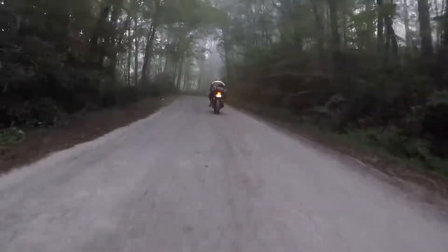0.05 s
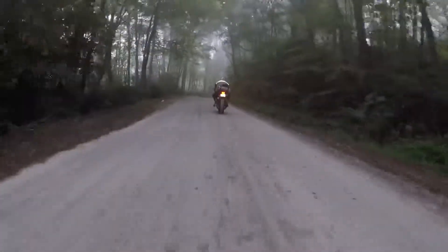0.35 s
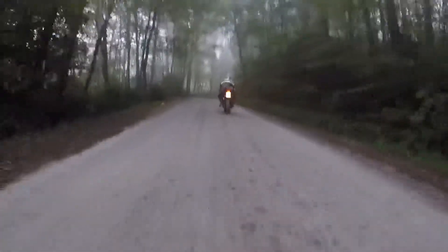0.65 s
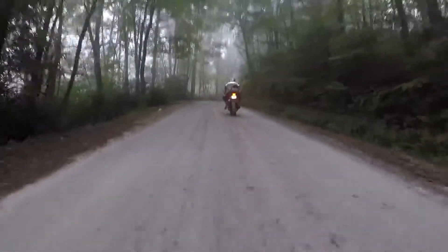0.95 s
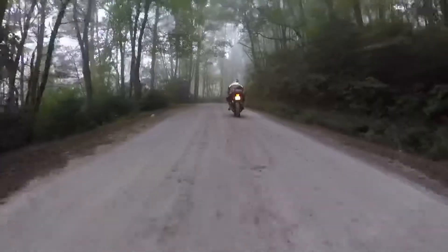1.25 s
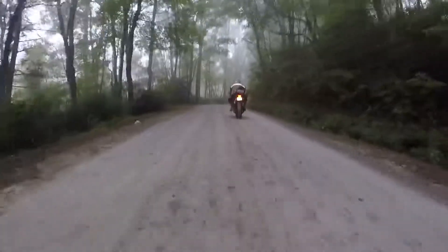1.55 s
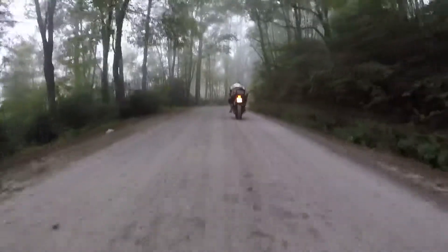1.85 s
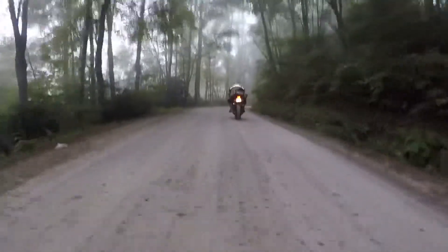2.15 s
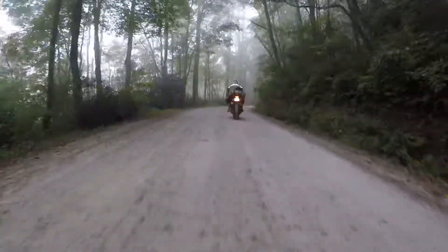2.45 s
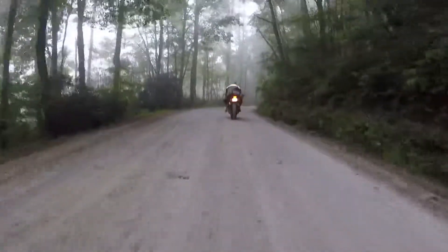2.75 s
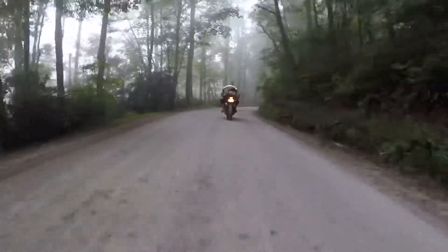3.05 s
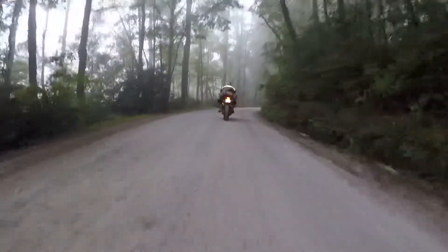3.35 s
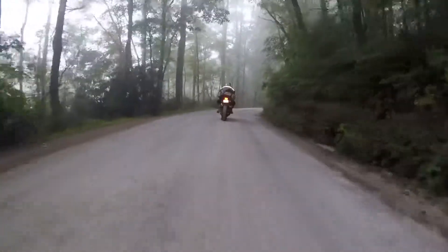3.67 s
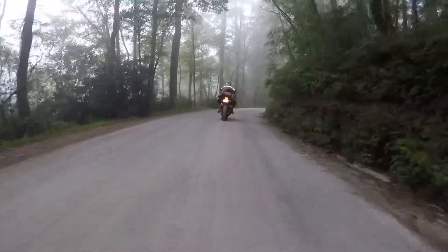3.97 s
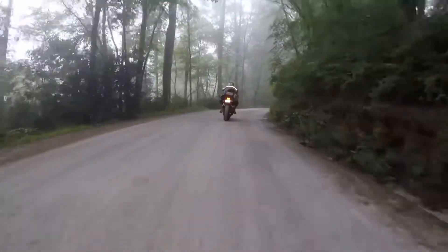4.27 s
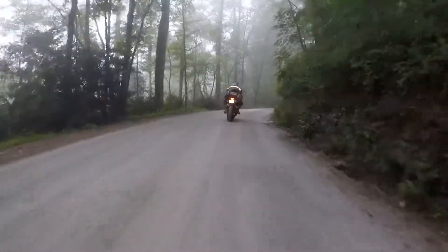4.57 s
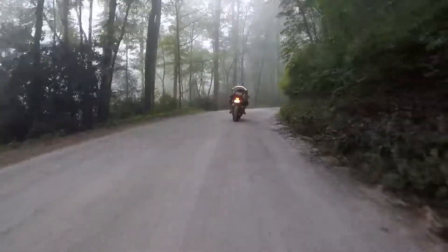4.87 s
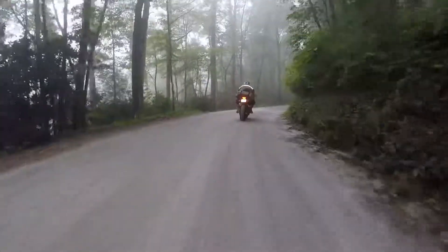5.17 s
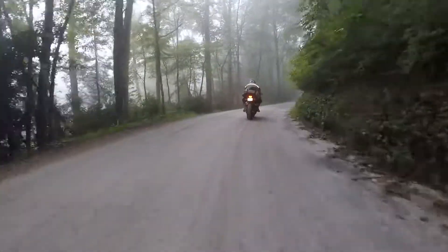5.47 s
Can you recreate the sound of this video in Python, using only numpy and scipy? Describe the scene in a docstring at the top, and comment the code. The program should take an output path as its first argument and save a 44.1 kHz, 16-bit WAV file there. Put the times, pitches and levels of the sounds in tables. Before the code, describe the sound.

A motorcycle rolls slowly along a gravel forest road, heard close up from its tail. The exhaust booms low and even over a rough hum and wind rumble, while the tyres crunch and a few stones tick up. As the revs sag, the boom stumbles, and the suspension gives one dull thump about halfway. Towards the end the boom fades into a higher drone and the engine and bodywork clatter more.

```python
"""A three-cylinder motorcycle rolls slowly along a gravel forest road, heard from its tail.
At first the exhaust booms evenly at the firing rate, blurred by a rough hum near 60 Hz, while wind
rumbles, tyres crunch and a few stones flick up. As the revs sag the boom stumbles and drops out for a
few firings at a time. At 3 s the suspension thumps over a rut. Towards the end the boom fades, its
second harmonic takes over, and the clatter of engine and bodywork comes forward."""
import sys
import numpy as np
from scipy import signal
from scipy.fft import rfft, irfft
from scipy.io import wavfile
from scipy.ndimage import uniform_filter1d, minimum_filter1d

SR = 44100
rng = np.random.default_rng(int(sys.argv[2]) if len(sys.argv) > 2 else 0)


def wav_out(sig):
    """Save sig, one row per channel (or a flat mono array), as 16-bit PCM at SR to the path in sys.argv[1]."""
    wavfile.write(sys.argv[1], SR, np.round(np.clip(np.atleast_2d(sig).T, -1, 1) * 32767).astype(np.int16))


N = 247842


def undb(db):
    """Amplitude ratio of a level in decibels."""
    return 10 ** (np.asarray(db) / 20)


def unit(x):
    """Normalisation to rms 1."""
    return x / np.sqrt(np.mean(x ** 2))


def curve(rows):
    """Linear interpolation of (time [s], value) rows at every sample."""
    times, values = np.transpose(rows)
    return np.interp(np.arange(N) / SR, times, values)


def walk(rate_hz):
    """Slow random modulation: values held for 1 / rate_hz seconds and smoothed twice; rms 1."""
    hold = int(SR / rate_hz)
    steps = np.repeat(rng.standard_normal(N // hold + 1), hold)
    return unit(uniform_filter1d(uniform_filter1d(steps, hold), hold)[:N])


def colour(x, points):
    """Spectral shaping by (frequency [Hz], level [dB]) points, rolling off beyond both ends; rms 1."""
    hz, db = np.transpose(points)
    f = np.maximum(np.arange(N // 2 + 1) * SR / N, 1)
    gain = undb(np.interp(np.log(f), np.log(hz), db))
    skirts = 1 / (1 + (hz[0] / f / 2) ** 2) / (1 + (f / hz[-1] / 2) ** 2)
    return unit(irfft(rfft(x) * gain * skirts, N))


def ring(x, hz, width_hz):
    """Second-order resonance with gain 1 at its centre."""
    return signal.lfilter(*signal.iirpeak(hz, hz / width_hz, fs=SR), x)


def body(x, modes):
    """Modal superposition, each mode two resonators in cascade for steep sides; rms 1."""
    return unit(sum(undb(db) * ring(ring(x, hz, 2 * width), hz, 2 * width) for hz, width, db in modes))


def rumble_and_hum(ride_db):
    """Masking: low wind rumble, plus a rough hum near 60 Hz that blurs the exhaust boom."""
    # wind rumble with the hum's peak at 60 Hz: (frequency [Hz], relative level [dB])
    spectrum = [(5, -13), (14, -3.5), (40, -5.5), (60, -0.5), (100, -9), (160, -14.5), (400, -38)]
    swell_db = 2 * walk(5.8)
    return undb(-2.5 + 0.65 * ride_db + swell_db) * colour(rng.standard_normal(N), spectrum)


def tyres():
    """Shot noise: dense random impacts of gravel, most faint and a few sharp, merge into a crunch."""
    # gravel spectrum: (frequency [Hz], relative level [dB])
    spectrum = [(300, -10), (900, 6), (2000, -5.5), (4000, -20.5), (6000, -18), (7500, -26.5),
                (8900, -26.5), (10000, -34.5), (12000, -42.5), (14200, -74)]
    hits = rng.random(N) < 4000 / SR  # 4000 impacts a second
    grains = hits * rng.standard_normal(N) * undb(1.4 * rng.exponential(size=N))
    return undb(-9.5) * colour(grains * undb(0.33 * walk(16)), spectrum)


def knock(at_s, db, hz, width_hz, decay_s):
    """Damped vibration: exponentially decaying noise, starting near level db, drives one mode."""
    age = np.arange(N) / SR - at_s
    fade = (age >= 0) * np.exp(-np.abs(age) / decay_s)
    ringing = body(fade * rng.standard_normal(N), [(hz, width_hz, 0)])
    return undb(db) * np.sqrt(np.mean(fade ** 2)) * ringing


def stones():
    """Impact excitation: single stones tick against the mudguard and frame."""
    # stone strikes: (time [s], level [dB], frequency [Hz], decay time [s])
    strikes = [(0.315, -16.5, 920, .004), (0.482, -56, 8000, .008), (0.553, -60, 9000, .003),
               (0.972, -34, 2200, .012), (1.415, -51, 6000, .008)]
    return sum(knock(at_s, db, hz, 0.16 * hz, decay_s) for at_s, db, hz, decay_s in strikes)


def thump():
    """Structure-borne sound: a rut sends a dull jolt through the suspension and frame."""
    return knock(at_s=3.02, db=-16, hz=130, width_hz=45, decay_s=0.087)


def clatter(firings, firing_hz):
    """Forced vibration: gas and valve noise pulses with the firings and shakes covers and bodywork."""
    # spectrum of the mechanical rush: (frequency [Hz], relative level [dB])
    rush_spectrum = [(150, -8.5), (270, -3.5), (460, 9.5), (545, -4.5), (900, 1.5), (1200, -1), (1950, -7),
                     (2300, -19), (3300, -15.5), (3900, -26.5), (5050, -31), (5900, -27.5), (7300, -41.5),
                     (13000, -69.5)]
    # modes of covers and bodywork: (frequency [Hz], nominal bandwidth [Hz], relative level [dB])
    panel_modes = [(666, 43, -4), (820, 75, -4), (1268.5, 32.3, 0), (1413, 100, -8), (1593, 37.5, 3.5),
                   (1910, 99, -5.5), (2190, 23, -7.5), (2264, 35, -11), (2583, 40, -10.5), (2938, 102, -13),
                   (3440, 110, -18.5), (4010, 100, -26.5), (4396, 71, -24.5), (4686, 31, -26.5),
                   (5706, 400, -25.5), (7380, 84, -40), (8730, 240, -39)]
    resonant_hz, resonant_width_hz = 70.1, 1.3  # the covers ring most freely at this firing rate
    ringing_db = -3.5 + 2.5 * np.exp(-((firing_hz - resonant_hz) / resonant_width_hz) ** 2)
    beat = 1 + 0.082 * np.cos(2 * np.pi * firings)
    shake = beat * undb(0.15 * walk(60) + 0.27 * walk(8.0))
    rush = colour(shake * rng.standard_normal(N), rush_spectrum)
    panels = body(shake * rng.standard_normal(N), panel_modes)
    return undb(-1.0) * rush + undb(ringing_db) * panels


def burble(firings):
    """Pipe resonance: on a light throttle each charge burns differently; uneven kicks ring the pipes."""
    # exhaust and air box modes: (frequency [Hz], nominal bandwidth [Hz], relative level [dB])
    pipe_modes = [(75.1, 10.3, 1.5), (106, 22, -11), (206.9, 12.2, -3.5), (297, 21.4, -10.5),
                  (384, 22.5, -10), (459.6, 34.6, -15.5)]
    fired = np.diff(np.floor(firings), prepend=0)
    return undb(3.0) * body(fired * rng.standard_normal(N), pipe_modes)


def partial(turns, flutter_db, wobble_rad):
    """Random phase and amplitude modulation of a sinusoid of rms 1."""
    angle = 2 * np.pi * turns + wobble_rad * walk(18)
    return np.sqrt(2) * np.cos(angle) * undb(flutter_db * walk(22))


def lope(firings):
    """Subharmonics: the cylinders are not alike, so the wave repeats only once in three firings."""
    # weaker engine partials: (multiple of the four-stroke cycle rate, relative level [dB])
    orders = [(2, -6.5), (4, 1), (5, -10.5), (10, -11), (12, -16.5), (14, -21), (15, -13), (16, -15),
              (17, -20.5), (18, -12.5), (19, -17.5), (21, -11)]
    cycles = firings / 3
    partials = sum(undb(db) * partial(order * cycles + rng.random(), flutter_db=3.0, wobble_rad=0.28)
                   for order, db in orders)
    # whichever partial slides into the air box resonance growls louder
    return partials + undb(2.5) * ring(partials, hz=381, width_hz=7.8)


def exhaust(firings, firing_hz, ride_db):
    """Harmonic series: the silencer radiates the firing rate and two overtones, unevenly at low revs."""
    # unsteadiness of the boom: (firing rate [Hz], phase wobble [rad], mean depth of dips [dB])
    stumble = [(65, .45, 4), (67, .3, 2.5), (67.2, .14, 1.0), (70, .05, 0.6)]
    # lapses of the boom, each a few firings long: (time [s], depth [dB])
    dropouts = [(.52, 1.5), (1.8, 7), (2.25, 5.5), (2.419, 10), (2.63, 6), (2.78, 24), (2.96, 13),
                (3.04, 14), (3.36, 15), (3.55, 9)]
    # third harmonic: (time [s], level [dB])
    third_levels = [(0, -25), (.39, -17.5), (.55, -27.5), (.7, -21), (1.06, -36), (1.27, -23), (1.5, -32.5),
                    (1.85, -26.5), (2.43, -34), (2.7, -27), (4.86, -22), (5.62, -26)]
    knee_hz, dropout_half_s = 64.07, 0.023
    t = np.arange(N) / SR
    at_hz, wobble_rad, depth_db = np.transpose(stumble)
    dips_db = np.interp(firing_hz, at_hz, depth_db) * walk(30) ** 2
    dropout_db = sum(db * np.exp(-((t - at_s) / dropout_half_s) ** 2) for at_s, db in dropouts)
    boom = partial(firings, flutter_db=0.1, wobble_rad=np.interp(firing_hz, at_hz, wobble_rad))
    second = partial(2 * firings - 1 / 4, flutter_db=1.7, wobble_rad=0.13)
    third = partial(3 * firings, flutter_db=1.2, wobble_rad=0.1)
    # below the knee the boom fades and the second harmonic takes over
    sag_hz = np.maximum(knee_hz - firing_hz, 0)
    boom_db = -9 - 3 * sag_hz - dips_db - dropout_db
    second_db = ride_db + 3.5 + 2.5 * sag_hz
    return undb(boom_db) * boom + undb(second_db) * second + undb(curve(third_levels)) * third


def scene():
    """Superposition of engine, road, wind and hum; one firing phase times the engine sounds."""
    # engine speed: (time [s], firing rate [Hz])
    speed = [(0, 72.18), (.55, 70.43), (.95, 71.44), (1.29, 69.56), (1.62, 66.06), (2.13, 68.77),
             (2.33, 65.6), (3.26, 65.19), (3.72, 64.16), (5.07, 62.23), (5.38, 63), (5.62, 62.66)]
    # overall gain of machine and road noise: (time [s], level [dB])
    ride = [(0, -33), (.35, -31), (.6, -34), (1.55, -34.5), (2.1, -32), (2.4, -33), (3.05, -27), (4.2, -24),
            (5.62, -23)]
    firing_hz, ride_db = curve(speed), curve(ride)
    firings = np.cumsum(firing_hz) / SR
    machine_and_road = lope(firings) + burble(firings) + clatter(firings, firing_hz) + tyres()
    motorcycle = exhaust(firings, firing_hz, ride_db) + undb(ride_db) * machine_and_road
    return (motorcycle + rumble_and_hum(ride_db) + stones() + thump())[None]


def record(dry):
    """Peak limiting: the gain falls smoothly around each high peak; a low-pass then cuts the top."""
    ceiling_db, top_hz = -1.8, 15700
    reach = int(0.017 * SR)
    driven = undb(0.33) * dry
    allowed_gain = 1 / (1 + (np.abs(driven) / undb(ceiling_db)) ** 6) ** (1 / 6)
    gain = uniform_filter1d(minimum_filter1d(allowed_gain, reach), reach)
    low_pass = signal.ellip(8, 0.2, 70, top_hz, fs=SR, output="sos")
    return signal.sosfilt(low_pass, driven * gain)


dry = scene()
out = record(dry)
wav_out(out)
```